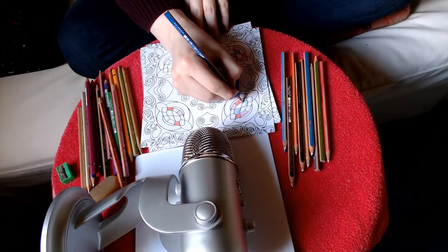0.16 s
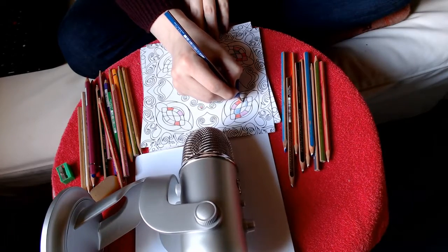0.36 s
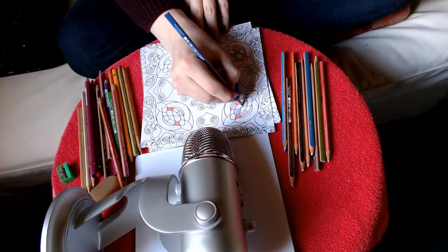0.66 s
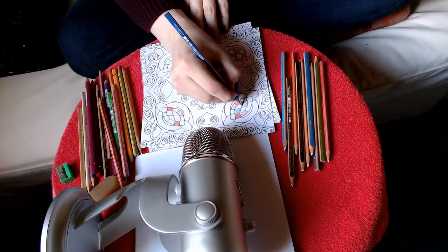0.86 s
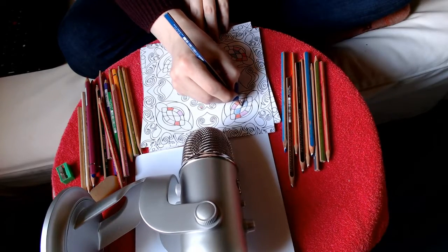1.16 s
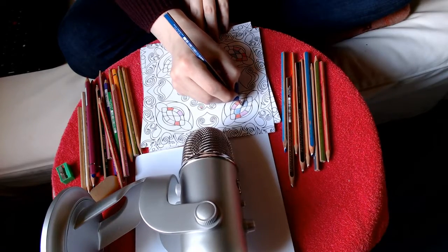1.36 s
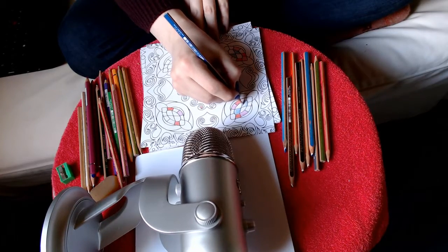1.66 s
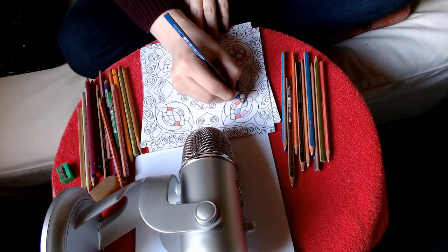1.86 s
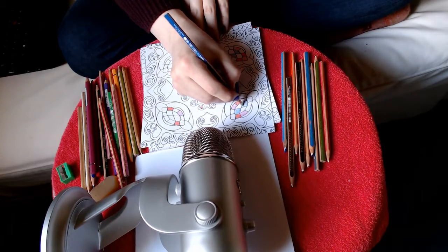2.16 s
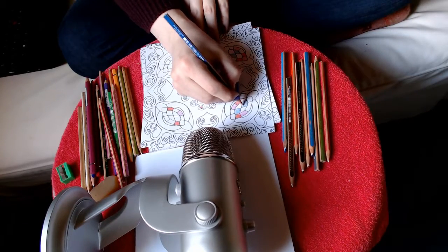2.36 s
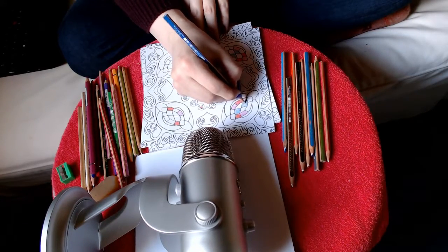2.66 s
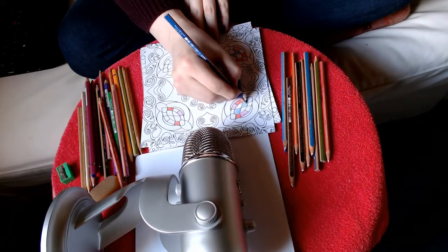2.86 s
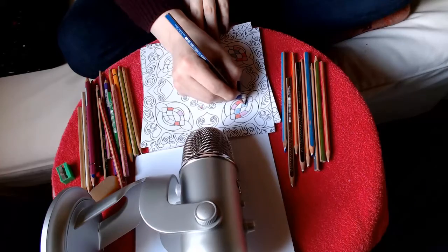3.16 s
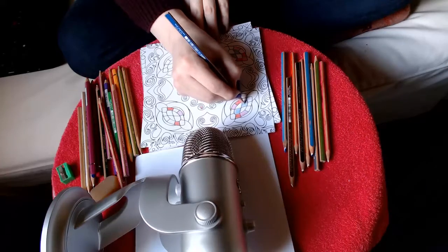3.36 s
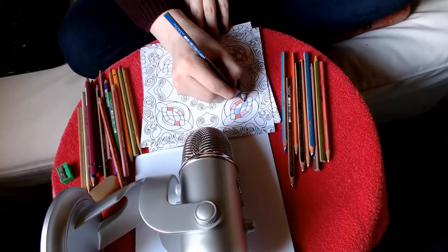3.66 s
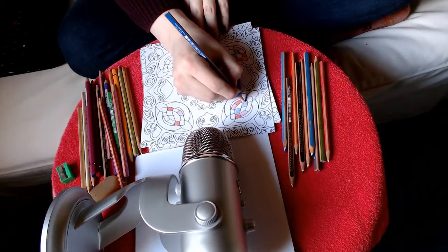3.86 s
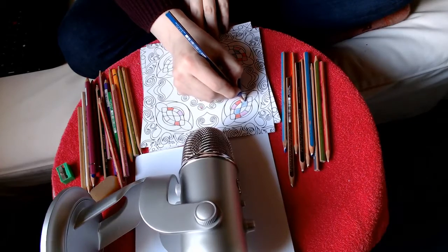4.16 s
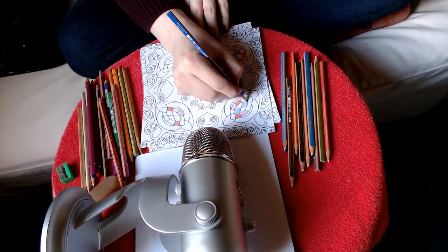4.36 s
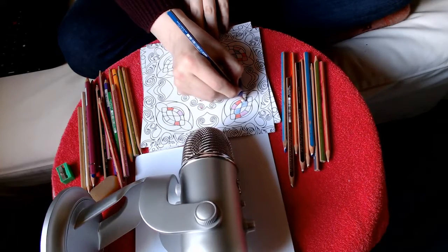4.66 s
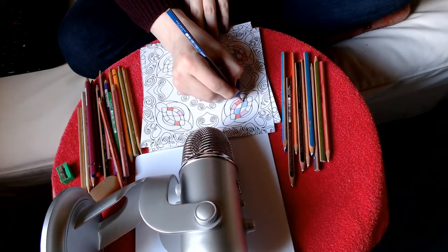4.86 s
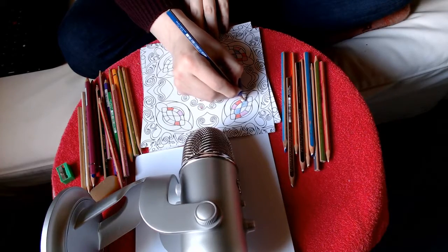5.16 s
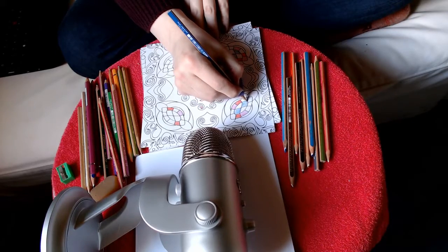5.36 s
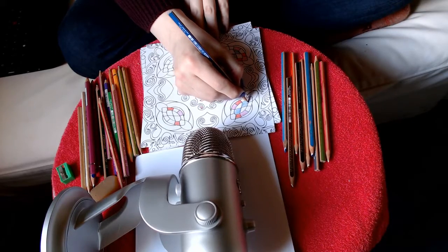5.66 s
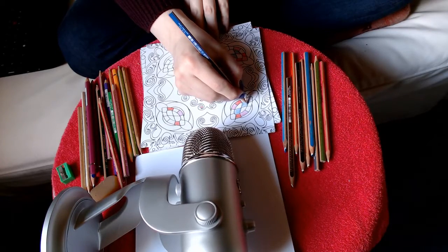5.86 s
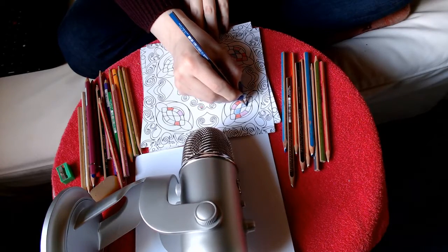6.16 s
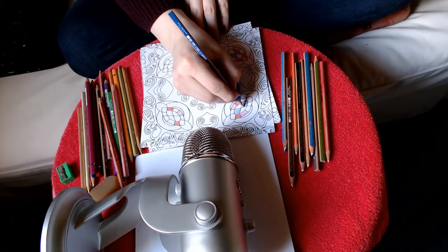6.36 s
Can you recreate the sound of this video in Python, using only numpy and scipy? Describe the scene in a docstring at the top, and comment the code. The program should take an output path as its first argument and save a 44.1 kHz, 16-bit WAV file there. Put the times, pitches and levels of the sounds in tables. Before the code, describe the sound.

Close, dry pencil scratching, about ten airy strokes a second, with soft hand bumps and deep undertone, thinning to faint, sparse strokes indoors.

```python
"""Coloured pencil shading a page, close stereo

On a small cloth-covered table, just under a stereo microphone, a pencil shades in quick back-and-forth strokes.
The lead hisses over the paper's tooth (random snaps and noise) and falls quiet at each turn; later strokes grow
light and slow. The page rustles faintly. The hand rubs and bumps the pad, ringing the table's modes, and the
table rocks the microphone stand: a dull undertone. Steady room and microphone noise lies beneath.
"""
import sys
import numpy as np
from scipy import signal
from scipy.fft import rfft, irfft
from scipy.io import wavfile
from scipy.ndimage import uniform_filter1d, map_coordinates

SR = 44100
rng = np.random.default_rng(int(sys.argv[2]) if len(sys.argv) > 2 else 0)


def master_out(mix):
    """Clip the mix to full scale and print it as 16-bit PCM to the path in sys.argv[1]."""
    frames = np.transpose(np.atleast_2d(mix))
    ceiling = np.clip(frames, -1, 1)
    pcm = np.round(ceiling * 32767).astype(np.int16)
    wavfile.write(sys.argv[1], SR, pcm)


N = 287091
TIME = np.arange(N) / SR  # s
HZ = np.fft.rfftfreq(N, 1 / SR)

# pencil strokes: start t/s, end t/s, scrape level/dB at full speed, share of the stroke spent speeding up (0-1),
# treble over bass/dB, level of the dragging hand/dB
STROKES = [(-.073, .024, -55, .6, 0, -54), (.007, .127, -74, .26, -3, -60),
           (.109, .183, -58.5, .56, 5, -55), (.184, .262, -58.5, .32, -5.5, -56.5),
           (.432, .468, -79, .4, 2, -60.5), (.499, .694, -63, .37, 6, -63), (.563, .642, -50, .5, 3, -53),
           (.74, .838, -52, .55, 3.5, -55.5), (.884, .992, -51.5, .4, -1, -54.5),
           (1.01, 1.11, -51.5, .43, -1, -52.5), (1.121, 1.249, -56, .61, -.5, -56),
           (1.25, 1.35, -53, .38, 2.5, -59.5), (1.374, 1.472, -54, .48, .5, -54),
           (1.47, 1.572, -49, .54, 4, -56.5), (1.57, 1.695, -52.5, .64, -1, -54),
           (1.698, 1.791, -49.5, .42, 3, -54.5), (1.799, 1.892, -52.5, .58, 0, -55),
           (1.894, 1.978, -49.5, .55, -1, -58.5), (1.983, 2.116, -58.5, .3, 4, -59),
           (2.09, 2.168, -50, .47, -1, -65), (2.174, 2.281, -54.5, .57, -.5, -58.5),
           (2.27, 2.364, -50, .38, -1, -65), (2.375, 2.473, -53, .42, -1.5, -51.5),
           (2.46, 2.562, -52.5, .58, -1, -60.5), (2.577, 2.684, -55, .48, 2.5, -56),
           (2.675, 2.762, -51, .33, 1, -61.5), (2.776, 2.865, -51.5, .67, 1, -55.5),
           (2.867, 2.947, -51, .38, -3, -57.5), (2.965, 3.067, -55, .26, -4, -59),
           (3.062, 3.162, -56, .4, -1.5, -61), (3.169, 3.253, -55, .5, -3, -57.5),
           (3.253, 3.343, -58, .43, -3, -64.5), (3.356, 3.436, -60.5, .35, -1, -66),
           (3.414, 3.528, -63.5, .45, 5.5, -67), (3.559, 3.647, -56.5, .31, -2, -57),
           (3.654, 3.74, -52, .48, 2.5, -58), (3.75, 3.841, -58, .43, .5, -55),
           (3.84, 3.91, -55.5, .45, 3.5, -63), (3.906, 3.993, -65.5, .33, -4, -62),
           (3.949, 4.06, -72, .6, -5, -65), (4.068, 4.168, -62, .36, -.5, -60),
           (4.181, 4.287, -67, .7, -3, -65.5), (4.304, 4.414, -60, .7, 1, -61),
           (4.413, 4.59, -63.5, .36, 2.5, -65), (4.601, 4.723, -59.5, .51, -2.5, -52.5),
           (4.716, 4.831, -58, .28, -2, -58), (4.843, 4.93, -71.5, .5, -3, -66.5),
           (5.025, 5.129, -75.5, .4, -4, -68), (5.18, 5.3, -61, .37, -3, -58),
           (5.541, 5.652, -76, .3, -.5, -65.5), (5.629, 5.727, -73.5, .5, 1.5, -62),
           (5.715, 5.828, -65.5, .25, .5, -59), (5.812, 5.878, -78.5, .4, 1, -65),
           (5.889, 5.989, -72, .5, -2, -62.5), (6.001, 6.183, -72.6, .54, -.5, -62),
           (6.133, 6.277, -70, .75, -7, -61.5), (6.255, 6.393, -66.5, .3, -.5, -62.5),
           (6.356, 6.444, -72, .4, -5, -59), (6.412, 6.586, -74, .35, -11, -58.5)]


def gain_of(db):
    """Decibels to an amplitude factor."""
    return 10 ** (np.asarray(db) / 20)


def evened(x):
    """Scales to an overall rms of 1."""
    return x / np.sqrt(np.mean(x ** 2) + 1e-20)


def steadied(x, size):
    """Holds the running level near rms 1, averaged over the given number of samples."""
    running_power = uniform_filter1d((x ** 2).mean(0), size)
    return x / np.sqrt(running_power + 1e-6 * np.mean(x ** 2))


def read(table):
    """Interpolates each column of a frequency table over log frequency."""
    hz, *columns = np.transpose(table)
    return np.array([np.interp(np.log(HZ + 1), np.log(hz + 1), column) for column in columns])


def follow(curve):
    """A (t/s, level/dB) curve as a gain at each sample."""
    return gain_of(np.interp(TIME, *np.transpose(curve)))


def coloured(x, table):
    """Filters by a spectrum in dB, then scales to rms 1."""
    return evened(irfft(rfft(x) * gain_of(read(table)), N))


def wander(rate_hz):
    """Smooth random drift of rms 1, its spectrum fading out around the given rate."""
    lowpass = np.exp(-(HZ / rate_hz) ** 2)
    return evened(irfft(rfft(rng.standard_normal(N)) * lowpass, N))


def pair(likeness, balance_db):
    """Left and right noise with the given correlation, the left one louder by the balance."""
    a, b = rng.standard_normal((2, N))
    c = np.clip(likeness, -1, 1)
    return np.array([a * gain_of(balance_db), c * a + np.sqrt(1 - c * c) * b])


def floor(level_db=-66):
    """Steady room rumble and microphone hiss: coloured noise, nearly unrelated at the two capsules."""
    # room and microphone noise: f/Hz, relative level per Hz/dB
    noise_colour = [(20, 31.5), (180, 24), (330, 4), (550, -5.5), (850, -15), (1400, -20.5), (2400, -20),
                    (3100, -18.5), (4000, -3.5), (5500, -5), (8400, -0.5), (11000, 1), (15500, 1.5)]
    return gain_of(level_db) * coloured(pair(likeness=-0.083, balance_db=0.0), noise_colour)


def room(x, wet_db=-18, t60=0.12):
    """A small furnished room: a short, weak tail of dense echoes, decaying 60 dB in t60 seconds."""
    t = TIME[:SR // 2]
    tail = rng.standard_normal((2, len(t))) * gain_of(-60 * t / t60)
    tail = tail * (t > .003)  # no echo before 3 ms
    tail = tail / np.linalg.norm(tail[0])
    return x + gain_of(wet_db) * signal.fftconvolve(x, tail, axes=1)[:, :N]


def rocking(level_db=11.0):
    """The table rocks the stand sideways at the bottom of hearing, moving the capsules in partly opposite senses."""
    # lowest rumble as the table rocks under the arm: t/s, level/dB before level_db is added
    sway_level = [(.05, -47.5), (.35, -62), (.6, -53), (1.05, -50), (1.3, -51.5), (1.62, -57), (1.72, -43),
                  (2.05, -51), (2.33, -46), (2.51, -62), (2.7, -44), (2.87, -54), (3.23, -47), (3.4, -54),
                  (4.0, -54), (4.78, -49.5), (4.95, -56.5), (6.48, -57.5)]
    # colour of that rumble: f/Hz, relative level per Hz/dB
    sway_colour = [(3, -14), (9, 1.5), (17, -4.5), (24, -14.5), (31, -15), (40, -23.5), (54, -22),
                   (74, -31), (92, -25.5), (130, -44), (220, -96.5)]
    sway = coloured(pair(likeness=-.6, balance_db=3.0), sway_colour)
    return gain_of(level_db) * follow(sway_level) * steadied(sway, size=6000)


def table_ring(x):
    """Pushes on the pad ring the table's low modes as decaying sines, muffled by the cloth."""
    # modes of the pad on the table: f/Hz, relative level/dB, t60/s
    modes = [(62.7, -8.5, 0.14), (104.4, 0, 0.18), (126.75, 6, .13), (159.9, 0.5, 0.11), (196, -3, 0.15),
             (244.2, -13, 0.19), (335, -22.5, 0.4)]
    # what the cloth lets through to the stand: f/Hz, gain/dB
    cloth = [(20, -11), (60, 2.5), (240, 1.5), (300, -11), (400, -23.5), (700, -15.5), (1100, -19.5),
             (1800, -30), (4000, -64.5)]
    t = TIME[:SR // 2]
    ring = sum(gain_of(db - 60 * t / t60) * np.sin(2 * np.pi * hz * t) for hz, db, t60 in modes)
    rung = signal.fftconvolve(x, ring[None], axes=1)[:, :N]
    return irfft(rfft(rung) * gain_of(read(cloth)), N)


def speed(start, end, rise=.5):
    """One movement: from rest to full speed after the given share of its length, and back to rest."""
    fastest = start + np.clip(rise, .05, .95) * (end - start)
    phase = np.interp(TIME, [start, fastest, end], [0, .5, 0])
    return np.sin(np.pi * phase)


def dragging(grip=0.71, rise=.42):
    """Strength of the hand's rubbing: it slides along with every stroke, and shifts between some."""
    # the hand shifts on the pad on its own: start t/s, end t/s, level/dB
    shifts = [(.23, .29, -56.5), (.33, .395, -63), (.425, .51, -60.5), (.63, .72, -57.5),
              (1.33, 1.385, -59.5), (3.47, 3.545, -62.5), (4.91, 4.965, -68), (5.06, 5.115, -58.5),
              (5.29, 5.47, -75.5), (5.66, 5.93, -63), (6.215, 6.275, -54)]
    lead_s, lag_s = .022, 0.0097  # the hand moves before the tip bites and stops just after it
    resting_db = -74  # the hand never lies quite still
    slides = [(start - lead_s, end + lag_s, db) for start, end, _, _, _, db in STROKES]
    slides += list(shifts)
    power = sum((gain_of(db) * speed(start, end, rise) ** grip) ** 2 for start, end, db in slides)
    return np.sqrt(power + gain_of(resting_db) ** 2)


def hand(drag, rub_db=0, jerk_db=1.56, bump_db=-5.0, bump_right_db=-5, scuff=0.036, scuff_s=0.0094):
    """The side of the hand drags in small jerks; now and then hand or pencil bumps the pad and scuffs on."""
    # soft bumps of pencil and hand on the pad: t/s, strength/dB
    bumps = [(0.156, -43.5), (0.238, -40.5), (0.753, -66), (0.887, -42), (1.037, -46.5), (1.164, -45.5),
             (1.33, -45.5), (1.696, -48), (2.014, -44), (2.404, -42), (2.783, -50.5), (2.877, -48),
             (3.179, -43.5), (3.593, -49), (3.754, -46.5), (4.622, -50), (4.66, -35), (5.063, -63),
             (5.184, -60.5)]
    jerks = gain_of(jerk_db * wander(rate_hz=42))
    rub = steadied(table_ring(pair(likeness=-0.012, balance_db=6.0) * jerks), size=2200)

    blows = np.zeros((1, N))
    for s, db in bumps:
        blows[0, round(s * SR)] = gain_of(db)
    # each blow leaves a scuff of noise that dies away
    slide = signal.lfilter([1], [1, -np.exp(-1 / (scuff_s * SR))], blows)
    thuds = table_ring(blows + scuff * slide * rng.standard_normal(N))
    thuds *= blows.max() / abs(thuds).max()  # the loudest thud peaks as high as the strongest blow
    thuds = thuds * gain_of([[0], [bump_right_db]])  # weaker at the right capsule
    return gain_of(rub_db) * drag * rub + gain_of(bump_db) * thuds


def page(force, drag, pencil_db=-93, pencil_growth=0.48, hand_db=-99.0, hand_growth=0.86, crinkle_db=2.44):
    """The sheet itself rustles faintly, pushed by the tip and by the hand."""
    # low rustle of the page: f/Hz, relative level per Hz/dB
    sheet = [(150, -6), (380, -1), (520, 4.5), (600, -2), (700, -1.5), (830, 0.5), (920, -7), (1020, -5.5),
             (1400, -25.5), (2200, -33), (4000, -62.5)]
    crinkle = gain_of(crinkle_db * wander(rate_hz=84))
    rustle = coloured(pair(likeness=0.13, balance_db=-2.5) * crinkle, sheet)
    by_pencil = gain_of(pencil_db) * evened(force ** pencil_growth)
    by_hand = gain_of(hand_db) * evened(drag ** hand_growth)
    return np.hypot(by_pencil, by_hand) * rustle


def friction(bite=1.0):
    """Strength of the scraping: the tip bites in, speeds up and eases to a stop within each stroke."""
    power = sum((gain_of(db) * speed(start, end, rise) ** bite) ** 2
                for start, end, db, rise, _, _ in STROKES)
    return np.sqrt(power)


def tooth(fibres_per_s, spread_db, smear):
    """Tiny snaps of uneven size as the lead catches fibres, over the even hiss of smearing wax."""
    size = gain_of(spread_db * np.minimum(rng.exponential(1, N), 4))
    caught = rng.random(N) < fibres_per_s / SR
    snaps = size * caught * rng.standard_normal((2, N))
    return evened(evened(snaps) + smear * rng.standard_normal((2, N)))


def near_echoes(x, drift_s=.000018):
    """Close echoes comb the hiss; their paths shift a little as the hand moves."""
    # echoes of the tip off hand, table and microphone body: delay t/s, level/dB
    echoes = [(.0009, -17.5), (.0017, -20), (.0029, -13), (.0046, -15), (.0071, -13)]
    out = x.copy()
    for delay, db in echoes:
        at = (TIME - delay - drift_s * wander(rate_hz=3.7)) * SR
        out += gain_of(db) * map_coordinates(x, [at], order=3, mode="constant")
    return out


def tilted(x, pivot_hz=9000):
    """The worn facet of the lead makes each stroke a little brighter or duller."""
    start, end, _, _, bright_db, _ = np.transpose(STROKES)
    tilt = gain_of(np.interp(TIME, (start + end) / 2, bright_db) / 2)  # half cuts the bass, half lifts the treble
    dull = irfft(rfft(x) / (1 + (HZ / pivot_hz) ** 4), N)
    return dull / tilt + (x - dull) * tilt


def scratch(force, level_db=0, chatter_db=1.08):
    """The hiss of the chattering lead, coloured differently on its way to each capsule."""
    # scratch with the pencil pressed firmly: f/Hz, left and right relative level per Hz/dB
    firm = [(2000, -57.8, -57.8), (3300, -33.5, -32.1), (4600, -18.9, -21.8), (5500, -11.1, -18.7),
            (6000, -17.9, -11.6), (6900, -11.0, -13.6), (8400, 0.0, -2.2), (9200, -12.3, -13.1),
            (10000, -4.6, -8.4), (11400, -5.8, -14.5), (12100, -3.9, -9.1), (13100, -12.6, -11.9),
            (14300, -4.7, -6.9), (15500, -11.4, -11.1)]
    # scratch with the pencil held lightly: f/Hz, left and right relative level per Hz/dB
    light = [(2000, -44.4, -43.7), (3200, -27.1, -27.4), (4200, -19.0, -19.4), (5200, -8.4, -14.0),
             (5600, -9.7, -12.4), (6700, -12.4, -11.5), (8400, -1.9, -4.3), (9300, -7.3, -9.2),
             (10400, -5.3, -8.3), (11200, -4.0, -10.5), (12100, 0.0, -2.8), (13400, -5.1, -4.9),
             (14700, -4.2, -2.2), (15500, -10.3, -8.5)]
    # the grip eases between these times: start t/s, end t/s
    grip_change = (3.9, 4.1)
    # the scratch at the two capsules: f/Hz, likeness (0-1), phase by which left leads/rad
    capsules = [(2520, 0.1, 2.6), (4410, 0.2, 2.5), (5640, 0.5, 0.28), (6550, .85, 2.7), (7240, 0.7, 2.14),
                (8640, 0.9, 3.53), (9350, 0.9, 4.53), (10070, 0.7, 2.8), (12460, 0.6, 3.3), (14450, 1, 4.3),
                (14680, 0.7, 2.2)]
    chatter = gain_of(chatter_db * wander(rate_hz=310))
    grit = tooth(fibres_per_s=7000, spread_db=-1.5, smear=1.2) * chatter

    direct, scattered = (rfft(near_echoes(x)) for x in grit)
    likeness, lead = read(capsules)
    likeness = np.clip(likeness, 0, 1)
    right = likeness * direct + np.sqrt(1 - likeness ** 2) * scattered
    right = right * np.exp(-1j * lead)
    stereo = irfft(np.array([direct, right]), N)

    eased = np.interp(TIME, grip_change, [0, 1])
    hiss = (1 - eased) * coloured(stereo, firm) + eased * coloured(stereo, light)
    return gain_of(level_db) * force * tilted(hiss)


def scene():
    """Pencil and page sound in the room; hand, rocking stand and steady noise are added without its echoes."""
    force, drag = friction(), dragging()
    on_paper = scratch(force) + page(force, drag)
    return room(on_paper) + hand(drag) + rocking() + floor()


def record(dry):
    """The recorder's band limit: a steep lowpass at 15750 Hz."""
    lowpass = signal.firwin(511, 15750, window=("kaiser", 9), fs=SR)
    return signal.oaconvolve(dry, lowpass[None], "same")


dry = scene()
out = record(dry)
master_out(out)
```